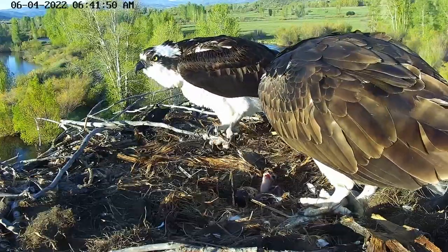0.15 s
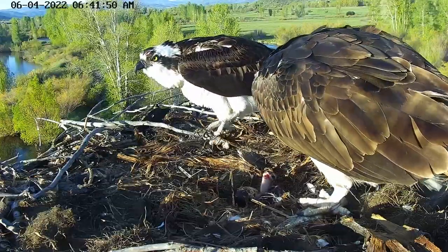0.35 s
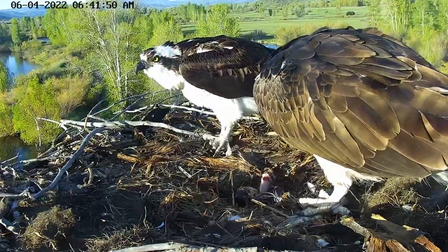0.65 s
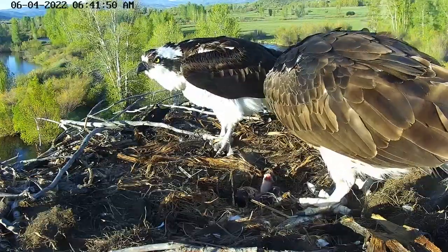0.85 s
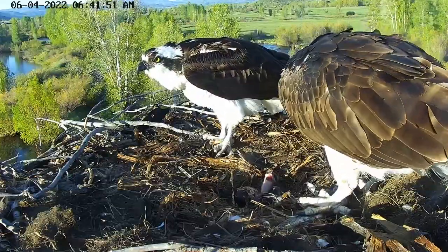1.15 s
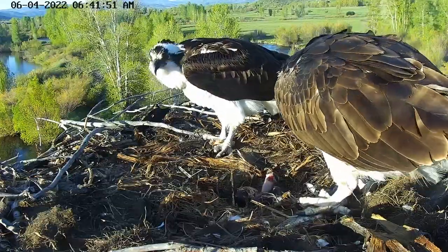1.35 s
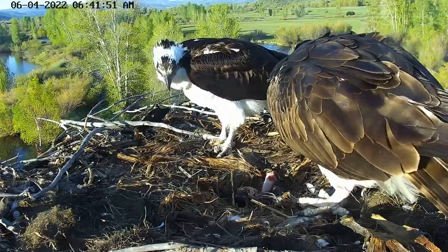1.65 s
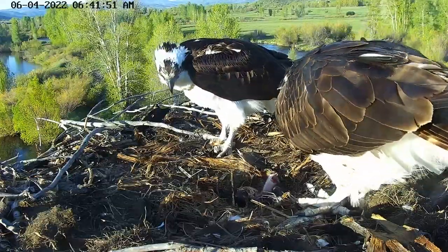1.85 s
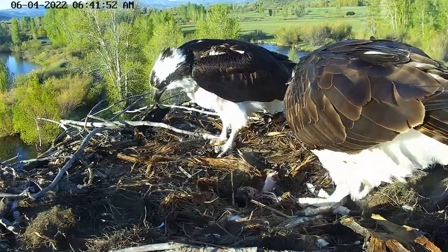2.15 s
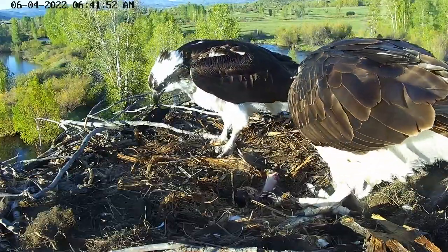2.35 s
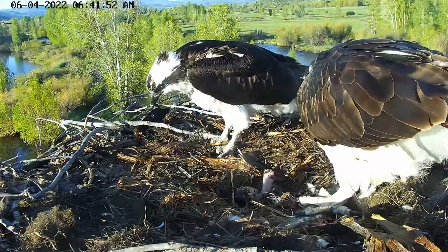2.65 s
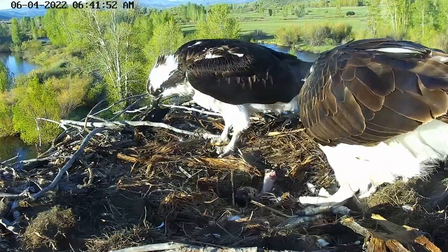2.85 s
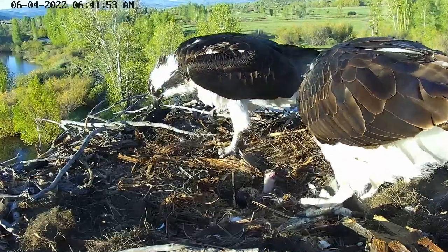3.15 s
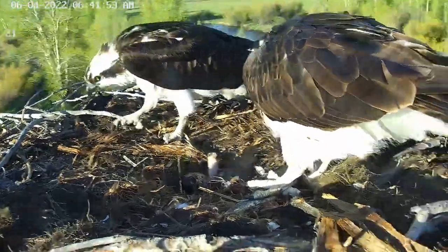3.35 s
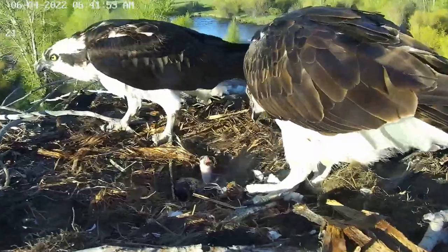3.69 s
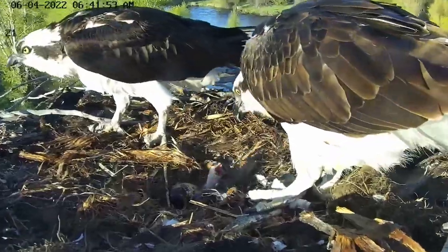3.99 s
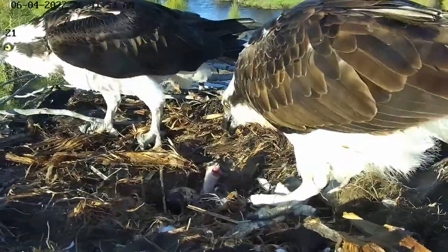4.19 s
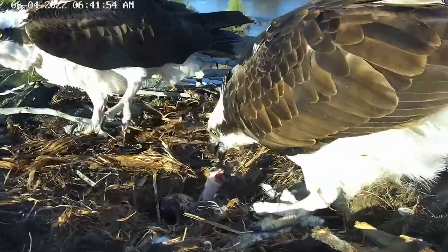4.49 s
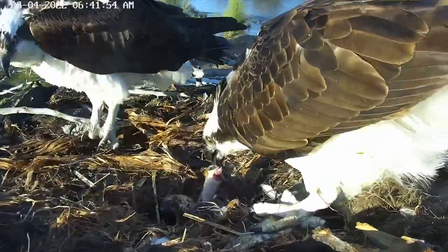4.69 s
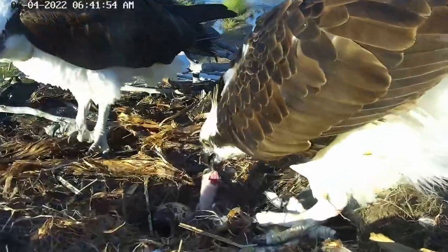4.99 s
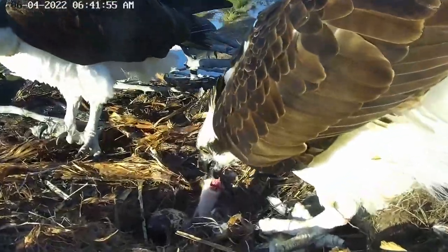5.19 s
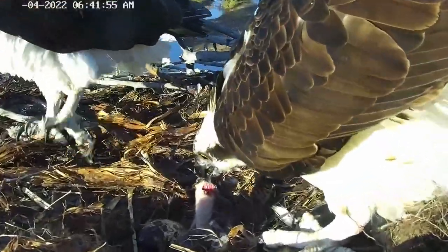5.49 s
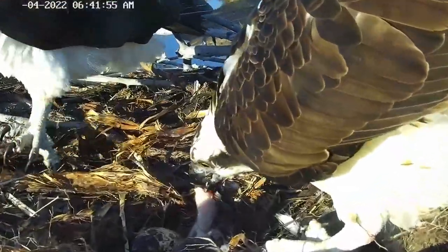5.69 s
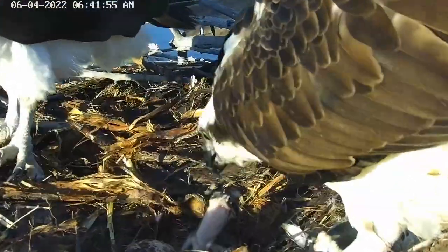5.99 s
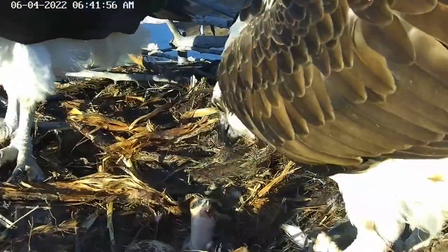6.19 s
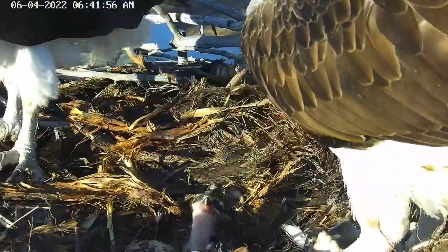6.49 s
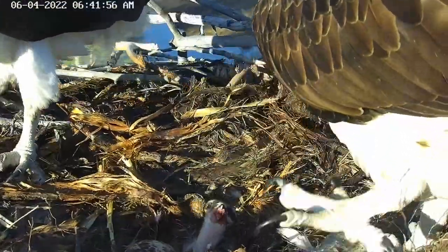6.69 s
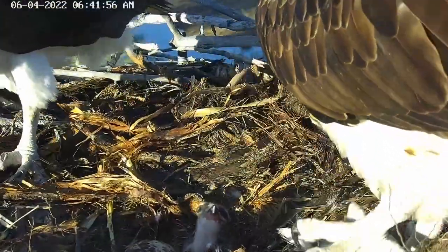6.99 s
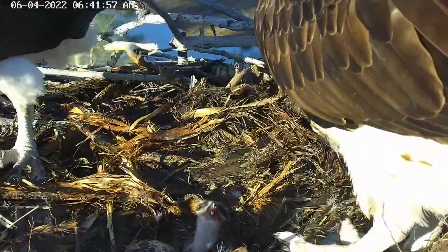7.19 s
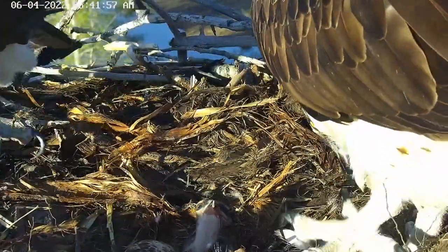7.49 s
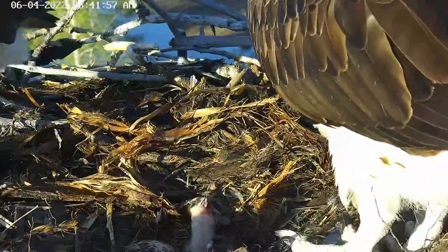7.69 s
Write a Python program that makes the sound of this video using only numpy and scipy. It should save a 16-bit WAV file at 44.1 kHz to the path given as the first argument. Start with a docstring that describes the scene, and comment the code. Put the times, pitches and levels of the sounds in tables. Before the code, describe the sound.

Two ospreys call close to a small, bright-ringing microphone on a dry stick nest in the open. Piercing split-second chirps repeat regularly, then stop as hoarse peeps and faint gliding whistles take over. Twigs crack underfoot, nest lining rustles and wings briefly ruffle. Wind is mild early, then becomes a tearing low rumble with hard thumps, strongest near the end around a clean yelp.

```python
"""Ragged low thumps of wind open the scene, over a hissing valley, faint ticking and twigs crackling underfoot.
Then two ospreys chirp on their stick nest, close to a small outdoor camera whose microphone rings near 6.5 kHz.
Arched chirps turn raspy; two clean low yelps, a ruffle of wings, thin whistles and two hoarse peeps join them.
Calls are harmonic tones on moving pitches plus air; twigs are noise bursts; wind is filtered kicks and short
pushes; valley, leaves and wings are patchy coloured noise, and the nest lining adds dry crackle to it."""
import sys
import numpy as np
from scipy import signal
from scipy.fft import rfft, irfft, next_fast_len
from scipy.io import wavfile
from scipy.ndimage import uniform_filter1d, map_coordinates

SR = 44100
rng = np.random.default_rng(int(sys.argv[2]) if len(sys.argv) > 2 else 0)


def generate_wav(signal):
    """Clip the signal to [-1, 1] and save it as 16-bit WAV at the path in sys.argv[1]."""
    frames = np.transpose(np.atleast_2d(signal))
    scaled = np.clip(frames, -1, 1) * 32767
    pcm = np.round(scaled).astype(np.int16)
    wavfile.write(sys.argv[1], SR, pcm)


N = 345743  # length [samples]


def amp(db):
    """Decibels to gain."""
    return 10 ** (np.asarray(db) / 20)


def unit(x):
    """Scale to rms 1."""
    return x / np.sqrt(np.mean(x ** 2) + 1e-20)


def curves(rows):
    """Draw each column after the time as an automation curve over the whole scene."""
    time, *columns = np.transpose(rows)
    return [np.interp(np.arange(N) / SR, time, column) for column in columns]


def wobble(rate, size):
    """A smooth random curve through `rate` random knots a second."""
    knots = rng.standard_normal(int(size * rate / SR) + 4)
    return map_coordinates(knots, [np.arange(size) * rate / SR])


def colour(x, points):
    """Equalise by (frequency [Hz], gain [dB]) points on a log frequency axis."""
    m = next_fast_len(len(x) + 8192)
    hz, db = np.transpose(points)
    log_hz = np.log(np.fft.rfftfreq(m, 1 / SR) + 1)
    gain = amp(np.interp(log_hz, np.log(hz), db))
    return irfft(rfft(x, m) * gain, m)[:len(x)]


def rush(spectrum, patchy_db):
    """Coloured noise of rms 1, mottled by patches of random gain in time and frequency."""
    z = signal.stft(rng.standard_normal(N), nperseg=512)[2]
    field = uniform_filter1d(rng.standard_normal(z.shape), size=4, axis=0)
    field = uniform_filter1d(field, size=10, axis=1)
    patchy = signal.istft(z * amp(patchy_db * unit(field)), nperseg=512)[1][:N]
    return unit(colour(patchy, spectrum))


def impulses(rate, spread_db):
    """Random kicks of uneven but bounded size, on average `rate` a second."""
    kicks = (rng.random(N) < rate / SR) * rng.choice([-1, 1], N)
    return kicks * amp(spread_db * np.clip(rng.standard_normal(N), -3, 1.7))


def crackle(size, grain_db):
    """Noise of rms 1 that comes in millisecond spits."""
    return unit(rng.standard_normal(size) * amp(grain_db * np.clip(wobble(891, size), -2, 2)))


def add(track, time, x):
    """Mix x into the track at a time in seconds."""
    i = max(round(time * SR), 0)
    track[i:i + len(x)] += x[:max(N - i, 0)]


def scatter(x, t60, wet_db):
    """Sticks and nearby trees return a faint diffuse tail that falls 60 dB in t60 seconds."""
    t = np.arange(SR // 2) / SR
    tail = rng.standard_normal(len(t)) * amp(-60 * t / t60) * (t > .004)
    return x + amp(wet_db) * signal.fftconvolve(x, tail / np.linalg.norm(tail))[:N]


def syrinx(hz, harmonics, overtone_db):
    """The voice organ as a harmonic tone on a moving pitch; overtone_db lifts all but the fundamental."""
    phase = 2 * np.pi * np.cumsum(hz) / SR
    tone = 0
    for k, (_, db) in enumerate(harmonics, 1):
        below_nyquist = k * hz < SR / 2
        tone = tone + amp(db + overtone_db * (k > 1)) * np.sin(k * phase) * below_nyquist
    return np.sqrt(2) * tone


# gusts on the microphone: (start [s], length [s], relative level [dB])
GUST_TIMES = [(0.0, .09, -16), (0.141, .04, -24), (0.35, .05, -36), (0.52, .10, -36), (0.691, .02, -32.5),
              (0.931, .08, -28), (1.082, .02, -23.5), (1.176, .02, -29.5), (1.251, .09, -28.5),
              (1.515, 0.056, -46.5), (3.38, 0.065, -33.5), (3.648, .03, -30), (3.743, .05, -27.5),
              (4.042, .04, -33), (4.167, 0.048, -28), (4.265, .03, -31), (4.47, .13, -30),
              (4.612, 0.28, -24.5), (4.937, 0.34, -24), (5.442, .38, -25), (6.003, .58, -24.5),
              (6.651, .30, -26.5), (7.192, .37, -14), (7.595, 0.186, -21.5)]
GUST_RISE_DB_PER_S, GUST_FALL_DB_PER_S = 700, 350
RAGGED_DB, RAGGED_RATE = 4, 48  # tearing of the flow: depth [dB], random knots a second


def gust_level(lull_db=-66, surge=0.72):
    """Wind level in dB: each gust rises, holds and dies away, torn by brief gaps in the flow."""
    t = np.arange(N) / SR
    level_db = np.full(N, float(lull_db))
    for start, length, db in GUST_TIMES:
        before, after = np.maximum(start - t, 0), np.maximum(t - start - length, 0)
        gust_db = db - GUST_RISE_DB_PER_S * before - GUST_FALL_DB_PER_S * after
        level_db = np.maximum(level_db, gust_db)
    return level_db + RAGGED_DB * np.minimum(wobble(RAGGED_RATE, N), surge)


def eddies(spectrum):
    """A ragged train of coloured kicks with an even mean power."""
    train = colour(impulses(rate=240, spread_db=5), spectrum)
    return train / np.sqrt(np.abs(uniform_filter1d(train ** 2, size=1800)) + 1e-9)


# tone of ordinary eddies: (frequency [Hz], gain [dB])
SLOW_EDDIES = [(15, -47), (25, -13.5), (59, -3), (130, 3), (193, 1), (347, -15), (488, -37), (530, -53),
               (650, -28), (840, -74), (1430, -120)]
# tone of fast eddies: (frequency [Hz], gain [dB])
FAST_EDDIES = [(15, -51), (25, -27), (43, -37), (70, 1.5), (211, 4), (350, 0.5), (435, -4.5), (549, -15),
               (800, -27), (1040, -75), (1760, -120)]
# the hardest buffets: (centre time [s], relative level [dB])
BUFFET_HITS = [(0.04, -6), (0.696, -16), (1.092, -10), (4.277, -16), (4.838, -14), (4.951, -12.5),
               (5.033, -14), (5.105, -11.5), (5.216, -9), (5.502, -14.5), (6.008, -9.5), (6.223, -12),
               (6.344, -9.5), (6.405, -12.5), (6.502, -12), (6.836, -10), (7.267, -4.5), (7.431, -3.5),
               (7.494, -3.5), (7.518, -4.5), (7.706, -9)]
BUFFET_HZ = 255  # pitch of a buffet at 0 dB; softer ones are lower


def wind(eddy_db=-2.0, buffet_db=-1, gust_db=-20, sharpen_per_db=.012):
    """Eddies hit the diaphragm one by one; the hardest give a single push and pull."""
    level_db = gust_level()
    # faster wind makes shorter, brighter thumps; the two kinds are equal at gust_db
    fast = 1 / (1 + amp(2 * (gust_db - level_db)))
    thumps = np.sqrt(1 - fast) * eddies(SLOW_EDDIES) + np.sqrt(fast) * eddies(FAST_EDDIES)
    out = amp(level_db + eddy_db) * thumps
    t = np.arange(SR // 40) / SR
    for time, db in BUFFET_HITS:
        cycles = BUFFET_HZ * np.exp(sharpen_per_db * db) * (t - t.mean())
        push = np.sin(2 * np.pi * cycles + rng.uniform(0, 2 * np.pi)) * np.exp(-1.8 * cycles ** 2)
        add(out, time - t.mean(), amp(db + buffet_db) * push)
    return out


# tone of the distant wash: (frequency [Hz], gain [dB])
VALLEY_TONE = [(25, -18), (80, 2.5), (110, 6), (190, -26), (280, 11.5), (340, -10), (420, 6), (560, -4.5),
               (830, 8), (1050, 4), (1400, -6), (2600, -64)]
# ride of the distant wash: (time [s], relative level [dB])
VALLEY_RIDE = [(0.0, -41.5), (0.5, -49), (2.93, -48.5), (3.23, -45.5), (5.46, -44), (6.97, -57.5),
               (7.47, -45.5), (7.84, -48.5)]


def valley(valley_db=2):
    """The valley's distant wash: patchy low noise on a gently moving level."""
    level_db, = curves(VALLEY_RIDE)
    return amp(level_db + valley_db) * rush(VALLEY_TONE, patchy_db=2.5)


# tone of the leaves: (frequency [Hz], gain [dB])
LEAF_TONE = [(700, -53), (1050, -7), (1400, 1), (1900, -6.5), (2800, -29)]
# breezes swelling in the leaves: (time of the height [s], half width [s], level [dB])
BREEZE_SWELLS = [(1.78, 0.25, -41.5), (2.48, 0.12, -44), (4.88, 0.2, -41), (5.9, 0.46, -41),
                 (7.5, 0.098, -43)]


def leaves(leaves_db=-54):
    """Leaves hiss faintly throughout and swell with each bell-shaped breeze, added as power."""
    t = np.arange(N) / SR
    power = amp(2 * leaves_db)
    for time, width, db in BREEZE_SWELLS:
        power = power + amp(2 * db) * np.exp(-((t - time) / width) ** 2)
    return np.sqrt(power) * rush(LEAF_TONE, patchy_db=4.5)


# body of the nest lining: (frequency [Hz], gain [dB])
LINING_BODY = [(1500, -1.5), (2300, -1), (2900, 3.5), (3600, 1), (4800, 0.5), (6000, 3), (9000, -9),
               (13000, -60)]
# fizz of the nest lining: (frequency [Hz], gain [dB])
LINING_FIZZ = [(3000, -22), (4500, -12), (5500, -6), (6150, 5.5), (6700, 2.5), (7400, -8), (8600, -23),
               (10600, -36.5), (12000, -53), (13500, -60)]
# stirring of the nest lining: (time [s], relative level [dB])
STIRRING = [(0.0, -46.5), (1.11, -51), (1.29, -41.5), (1.53, -43.5), (2.05, -32), (2.84, -42.5),
            (3.32, -43), (3.45, -32.5), (3.64, -43), (3.89, -51.5), (4.34, -32), (4.61, -32), (4.85, -34),
            (5.65, -30.5), (5.81, -27.5), (6.42, -32.5), (6.66, -29.5), (7.84, -37.5)]


def nest_lining(rustle_db=-44, rustle_grows=0.6, hiss_db=-1, grit=0.49):
    """Dry lining rustles as patchy noise and crackles as random kicks while the birds shift."""
    stir_db, = curves(STIRRING)
    shifting = amp(2.1 * wobble(40, N))
    fibres = impulses(rate=500, spread_db=8)
    body = rush(LINING_BODY, patchy_db=5) + grit * unit(colour(fibres, LINING_BODY))
    fizz = rush(LINING_FIZZ, patchy_db=4.0) + grit * unit(colour(fibres, LINING_FIZZ))
    # harder stirring brightens the lining: its body grows more slowly than its fizz
    body_db = rustle_db + rustle_grows * (stir_db - stir_db.mean())
    return shifting * (amp(body_db) * body + amp(stir_db + hiss_db) * fizz)


# tone of the ticks: (frequency [Hz], gain [dB])
TICK_TONE = [(2000, -25), (5000, -18), (6500, 16.5), (8500, -7), (11000, -1.5), (13500, -24)]


def ticking(tick_db=-56):
    """A faint, fine ticking of coloured kicks runs through the treble."""
    return amp(tick_db) * unit(colour(impulses(rate=110, spread_db=4), TICK_TONE))


# twigs snapping underfoot: (time [s], relative level [dB])
TWIG_SNAPS = [(0.055, -19), (0.637, -13), (1.315, -15), (1.872, -7), (2.374, -19), (2.974, -17),
              (3.289, -17), (3.507, -12), (4.113, -12), (4.179, -15), (4.54, -8), (4.935, -11.5),
              (6.207, -15), (6.785, -7.5), (6.809, -15), (6.866, -12), (6.972, -17)]


def twigs(snap_db=-14, splinter=0.26, t60=0.056):
    """Each snap is a noise crack with a short splintering tail."""
    out, t = np.zeros(N), np.arange(SR // 10) / SR
    for time, db in TWIG_SNAPS:
        shape = amp(-60 * t / 0.0095) + splinter * amp(-60 * t / t60)
        add(out, time, amp(db + snap_db) * shape * rng.standard_normal(len(t)))
    snaps = colour(out, [(1000, -6), (3000, -13), (6500, 3.5), (9000, -11.5), (13000, -27)])
    return scatter(snaps, t60=0.2, wet_db=-8)


# arched chirps: (time [s], rise [s], hold [s], fall [s], top pitch [Hz], end pitch [Hz],
# relative level [dB], overtones [dB], rasp [0-1], second voice [dB])
CHIRP_CALLS = [ (0.522, .038, 0.0025, .025, 3440, 1980, -31, -2, 0.2, 0),
               (1.103, 0.019, .023, 0.043, 3660, 2070, -34.5, -3.5, 0.5, 2.5),
               (1.581, 0.037, .001, 0.077, 3460, 2055, -30.5, -2.5, 0.19, -36),
               (2.120, 0.012, .036, .032, 3940, 2100, -37.5, -2, .6, -1),
               (2.582, 0.019, 0.026, 0.028, 4490, 1986, -28, -6.5, 0.41, -2),
               (2.979, 0.021, .026, 0.034, 4750, 2136, -28, -5, 0.49, -3),
               (3.385, 0.014, 0.019, 0.029, 4350, 2020, -30.5, -7.5, 0.77, 8.5),
               (3.86, 0.025, 0.022, 0.038, 4980, 1900, -30, -6, .45, -0.5),
               (4.323, 0.033, 0.02, 0.029, 5340, 4600, -33.5, -4.5, 0.6, -6),
               (4.731, .056, 0.012, 0.025, 5360, 4640, -32.5, -3, 0.76, -26),
               (5.198, .066, 0.035, 0.0079, 4600, 4900, -34.5, 0, 0.47, -30),
               (5.338, .012, 0.02, 0.067, 4950, 2280, -39, 0, 0.36, -14),
               (5.726, .026, 0.05, .016, 4900, 4900, -28, -20, 0.53, -40),
               (5.846, 0.011, .024, 0.045, 5060, 2600, -32, -15, .2, -40)]
# partials of chirps and whistles: (multiple of the pitch, level [dB])
WHISTLE_PARTIALS = [(1, 1.5), (2, 0), (3, -7), (4, -10.5), (5, -15)]
# tone of the air in the chirps: (frequency [Hz], gain [dB])
RASP_TONE = [(1000, -38), (3000, -1.5), (6500, -1), (9000, -3.5), (13000, 3)]
# a chirp climbs at this mean rate, but never starts below the slack pitch
RISE_HZ_PER_S, SLACK_HZ = 55000, 2080


def chirps(lag=.013, air_db=-4, slack_db=-6, air_tail_db=-12, air_t60=0.51, bend=1.4, sag=1.9,
           thin_db=6, jitter=0.025, shimmer_db=7, rasp_loss_db=-3, lift=1.6, edge_db=3):
    """Arched whistles brighten as they fall; the syrinx's second side splits off, trailing by `lag` seconds."""
    attack, release = .012, .007  # [s]
    whistle, breath = np.zeros(N), np.zeros(N)
    for time, rise, hold, fall, top_hz, end_hz, db, overtone_db, rasp, second_db in CHIRP_CALLS:
        length = rise + hold + fall
        t = np.arange(int(length * SR)) / SR
        start_hz = max(top_hz - RISE_HZ_PER_S * rise, SLACK_HZ)
        up = np.clip(1 - t / rise, 0, 1)  # climb still to go
        down = np.clip((t - rise - hold) / fall, 0, 1)  # share of the fall done
        climb = (top_hz - start_hz) * up ** lift
        drop = (top_hz - end_hz) * (np.sin(bend * down) / np.sin(bend)) ** sag
        arch = top_hz - climb - drop
        # the membranes rattle most while they are tight, at the top of the arch
        strain = rasp * (arch / top_hz) ** 4
        hz = arch * (1 + jitter * strain * (wobble(300, len(t)) + 2 * wobble(1500, len(t))))

        gate = np.clip(t / attack, 0, 1) ** 2 * np.clip((length - t) / release, 0, 1)
        slackening_db = slack_db * (up + down ** 4) * (1 - arch / top_hz) * 2
        level = gate * amp(db + slackening_db + 0.12 * wobble(210, len(t)))
        shimmer = amp(strain * (rasp_loss_db + shimmer_db * np.minimum(wobble(348, len(t)), 1)))
        first = level * shimmer * syrinx(hz, WHISTLE_PARTIALS, overtone_db + edge_db * down)
        add(whistle, time, first)
        # the trailing voice is thinner, with a weaker fundamental
        split = amp(second_db - thin_db) * level * np.clip(2 * down, 0, 1) ** 2
        add(whistle, time + lag, split * syrinx(hz, WHISTLE_PARTIALS, overtone_db + thin_db))
        add(breath, time, amp(air_db) * level * (strain + 0.12) * crackle(len(t), grain_db=5.5))
    # the broad rasp lingers in the sticks after each call
    air = scatter(2 * colour(breath, RASP_TONE), t60=air_t60, wet_db=air_tail_db)
    return scatter(whistle, t60=0.32, wet_db=-13.5) + air


def call_curves(rows):
    """Draw the columns of one call as curves over its own length."""
    time, *columns = np.transpose(rows)
    return [np.interp(np.arange(time[0], time[-1], 1 / SR), time, column) for column in columns]


# clean yelps on a slightly wavering pitch, one list each:
# (time [s], pitch [Hz], level [dB], overtones [dB])
YELP_CALLS = [
    [(1.977, 1900, -69, -8), (1.983, 1880, -19, -1), (1.996, 1782, -12.5, -6), (2.011, 1837, -11, -5),
     (2.016, 1960, -23, -1), (2.035, 1920, -19.5, -5.5), (2.056, 1905, -22, -18), (2.064, 1900, -53, -20)],
    [(7.287, 1520, -18, -21), (7.294, 1480, -11.5, -11), (7.301, 1582, -4.5, -14), (7.315, 1593, -4.5, -12),
     (7.335, 1599, -4, -17), (7.354, 1643, -13.5, -14), (7.364, 1690, -31, -20)],
]
# partials of yelps and peeps: (multiple of the pitch, level [dB])
YELP_PARTIALS = [(1, 2), (2, -2.5), (3, -28), (4, -54)]


def yelps(air_db=-24, air_grows=0.93):
    """Loud, nearly pure notes; more air escapes when the overtones are strong."""
    out = np.zeros(N)
    air_tone = [(1500, -14), (6500, -4), (9000, -8.0), (12500, 4)]
    for rows in YELP_CALLS:
        hz, db, overtone_db = call_curves(rows)
        air_level = amp(air_db + db / 2 + air_grows * overtone_db)
        air = air_level * colour(crackle(len(hz), grain_db=3), air_tone)
        add(out, rows[0][0], amp(db) * syrinx(hz, YELP_PARTIALS, overtone_db) + air)
    return scatter(out, t60=0.15, wet_db=-17)


# one ruffle of wings: (time [s], level [dB])
WING_BEAT = [(3.295, -54), (3.315, -30), (3.345, -20.5), (3.378, -21), (3.402, -20.5), (3.425, -30),
             (3.47, -40.5), (3.56, -49)]
# tone of the feathers: (frequency [Hz], gain [dB])
FEATHER_TONE = [(50, -23), (130, -11.5), (175, -5), (205, 8), (250, -9), (400, -4), (530, -18), (680, -9.5),
                (820, -1), (1000, -10), (1300, -5), (1500, -15.5), (2300, -19.5), (2750, -14), (3600, -43),
                (5000, -65)]


def wing():
    """Air rushes through the feathers in one beat of patchy noise."""
    level_db, = curves(WING_BEAT)
    t = np.arange(N) / SR
    beating = (t > WING_BEAT[0][0]) * (t < WING_BEAT[-1][0])
    return amp(level_db) * beating * rush(FEATHER_TONE, patchy_db=3.5)


# thin, faint whistles: (time [s], length [s], start pitch [Hz], end pitch [Hz], level [dB])
WHISTLE_CALLS = [(4.43, 0.088, 7120, 5920, -51.5), (6.838, 0.046, 5270, 6650, -42.5),
                 (6.979, .048, 4750, 6770, -40), (7.074, 0.061, 6380, 4730, -43.5)]


def whistles(overtone_db=-27):
    """Faint, almost pure notes that glide straight up or down."""
    out = np.zeros(N)
    for time, length, start_hz, end_hz, db in WHISTLE_CALLS:
        hz = np.linspace(start_hz, end_hz, int(length * SR))
        fade = signal.windows.tukey(len(hz), .5)
        add(out, time, amp(db) * fade * syrinx(hz, WHISTLE_PARTIALS, overtone_db))
    return scatter(out, t60=0.17, wet_db=-9)


# hoarse peeps: (time [s], length [s], level [dB])
PEEP_CALLS = [(6.518, .080, -24.5), (6.699, .068, -23)]
# what both peeps do: (share of the length, pitch [Hz], relative level [dB], flutter [Hz],
# relative undertone level [dB])
PEEP_CONTOUR = [(0, 2497, -18, 543, -28), (0.281, 2710, -1, 606, -14), (.58, 2943, 0, 731, -7),
                (.83, 3480, -19.5, 890, 12), (1, 2540, 0, 860, -9)]


def peeps(air_db=-24, overtone_db=-11):
    """A note splits: a second oscillation lays undertones one and two flutter rates below it."""
    out = np.zeros(N)
    share, *columns = np.transpose(PEEP_CONTOUR)
    for time, length, db in PEEP_CALLS:
        place = np.linspace(0, 1, int(length * SR))
        hz, swell_db, flutter_hz, under_db = [np.interp(place, share, column) for column in columns]
        hz = hz * (1 + .02 * wobble(700, len(hz)))
        tone = 0
        for k in range(3):  # the note itself, then its two undertones
            voice = syrinx(hz - k * flutter_hz, YELP_PARTIALS, overtone_db)
            tone = tone + amp(k * under_db - 2.7 * k) * voice
        air = amp(air_db) * rng.standard_normal(len(hz))
        add(out, time, amp(db + swell_db) * signal.windows.tukey(len(hz), .1) * (tone + air))
    return scatter(out, t60=0.22, wet_db=-9)


# the microphone's colour on birds and twigs: (frequency [Hz], gain [dB])
MIC_COLOUR = [(1500, -12.5), (2200, 0), (3400, 2), (4700, 6), (5500, 8.5), (6100, 13.5), (6500, 24),
              (6900, 13.5), (7600, 10.5), (9000, 2.5), (11000, 1), (13500, -14)]


def scene():
    """Calls and twigs pass through the microphone's resonance, over wind, wing and background."""
    background = valley() + leaves() + nest_lining() + ticking()
    near = twigs() + chirps() + yelps() + whistles() + peeps()
    return (wind() + background + colour(near, MIC_COLOUR) + wing())[None]


TOP_HZ = 13700  # band limit


def record(dry, ceiling=0.72):
    """The camera rounds off the hardest peaks and keeps nothing above its band limit."""
    squashed = dry / (1 + np.abs(dry / ceiling) ** 6) ** (1 / 6)
    m = next_fast_len(N + 8192)
    in_band = np.fft.rfftfreq(m, 1 / SR) < TOP_HZ
    return irfft(rfft(squashed, m) * in_band, m)[..., :N]


dry = scene()
out = record(dry)
generate_wav(out)
```